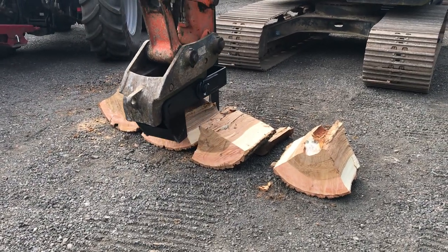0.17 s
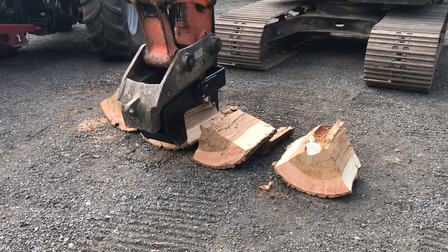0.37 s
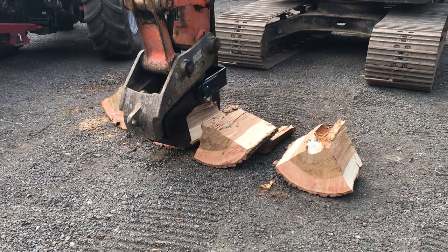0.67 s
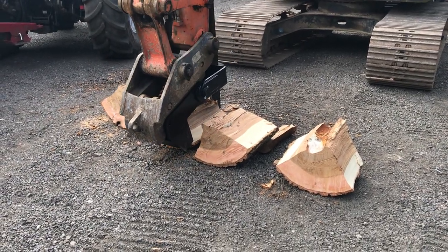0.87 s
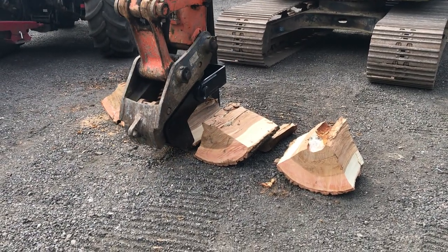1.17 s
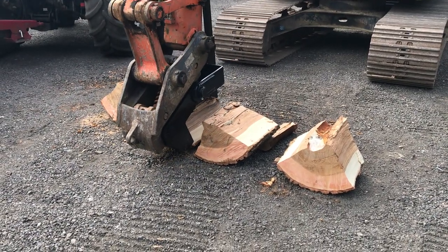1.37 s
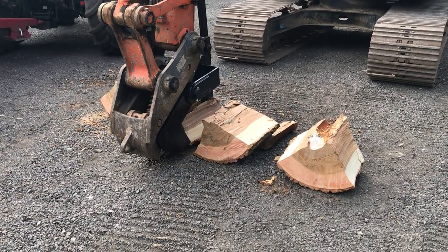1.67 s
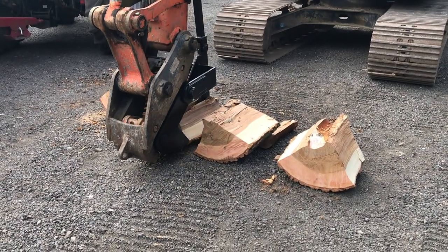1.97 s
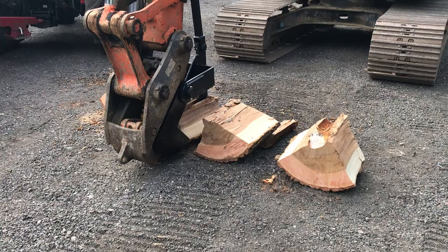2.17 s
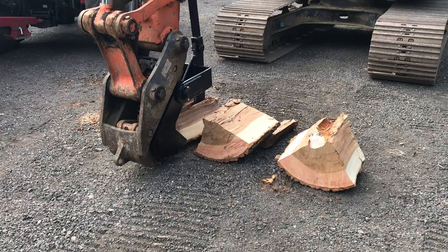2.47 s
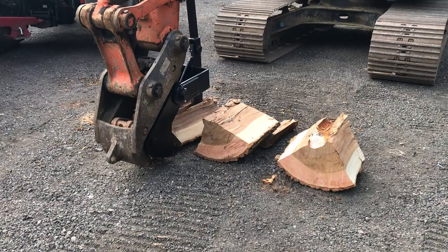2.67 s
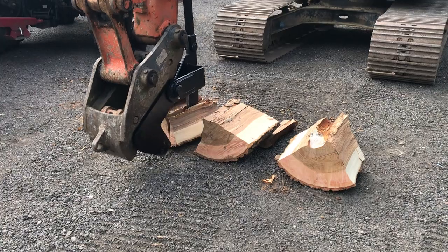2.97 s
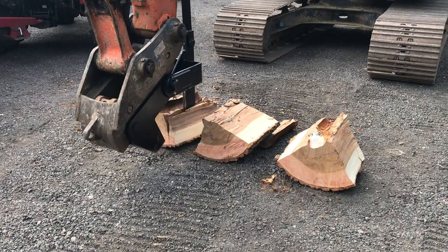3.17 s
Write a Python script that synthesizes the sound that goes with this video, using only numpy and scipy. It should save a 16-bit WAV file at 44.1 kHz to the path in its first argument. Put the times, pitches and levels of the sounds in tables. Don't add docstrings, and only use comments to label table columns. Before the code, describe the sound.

A log splits loudly over two idling diesels with low rumble and fan wash. Soft woody knocks come at 0.05 and 0.2 s, more at 0.8 s, a hollow crack at 0.95. From 1.17 to 1.32 s a harsh, buzzing tear rings with steel, then dense cracks and sharp snaps until 1.55. Pieces settle by 1.7; engines continue, a faint pump hum joins around 2.4, and valve hiss rises near 3.3.

```python
import sys
import numpy as np
from scipy import signal
from scipy.fft import rfft, irfft
from scipy.io import wavfile
from scipy.ndimage import uniform_filter1d

SR = 44100
rng = np.random.default_rng(int(sys.argv[2]) if len(sys.argv) > 2 else 0)


def gain_from_db(level_db):
    decades = np.asarray(level_db, float) / 20
    return 10 ** decades


def unload_audio(sound):
    columns = np.transpose(np.atleast_2d(sound))
    steps = np.round(np.clip(columns, -1, 1) * 32767)
    wavfile.write(sys.argv[1], SR, steps.astype(np.int16))


N = 145971


def unit(x):
    return x / np.sqrt(np.mean(x ** 2))


def noise(n=N):
    return rng.standard_normal(n)


def band(x, hz, width):
    return signal.lfilter(*signal.iirpeak(min(hz, .45 * SR), hz / width, fs=SR), x)


def colour(x, table):
    f, db = np.array(table, float).T
    bins = np.log(np.fft.rfftfreq(len(x), 1 / SR) + 1)
    gain = gain_from_db(np.interp(bins, np.log(f), db, left=-90))
    return irfft(rfft(x) * gain, len(x))


def walk(rate):
    k = int(SR / rate)
    stairs = np.repeat(noise(N // k + 1), k)
    return unit(uniform_filter1d(uniform_filter1d(stairs, k), k)[:N])


def rings(table, flicker_db, rate):
    total = np.zeros(N)
    for f, width, db in table:
        level = gain_from_db(db + flicker_db * walk(rate))
        total += level * unit(band(band(noise(), f, width), f, width))
    return total


def orders(phase, table, wobble_db, rate):
    total = np.zeros(N)
    for multiple, db in table:
        k = round(multiple)
        level = gain_from_db(db + wobble_db * np.sqrt(k) * walk(rate))
        total += np.sqrt(2) * level * np.sin(k * (phase + 1))
    return total


def rotation(hz, drift):
    return 2 * np.pi * np.cumsum(hz * (1 + drift * walk(3))) / SR


def engines(t):
    # multiple, level/dB
    near_orders = [(1, -30.5), (2, -43.5), (3, -45), (4, -44.5), (5, -55), (6, -48.5)]
    far_orders = [(1, -39), (2, -45)]
    # f/Hz, width/Hz, level/dB
    rumble = [(94.2, 26, -40), (147, 27.5, -38), (186.2, 19.6, -48.5), (221.7, 41, -43), (286, 49, -47)]
    # f/Hz, level/dB per Hz
    wash_colour = [(35, -42), (60, -9.5), (98, -6), (217, -13), (315, -20.5), (636, -28), (1410, -30),
                   (5000, -42.5), (16000, -60)]
    # f/Hz, width/Hz, level/dB
    fan = [(632, 203, -50.5), (860, 180, -52.5), (3160, 400, -61), (3244, 120, -63), (12060, 1200, -72),
           (1005, 35, -62), (1550, 90, -61), (1786, 47, -65.5), (657.3, 24, -59.5)]
    phase = rotation(47.28, 0.0023)
    tones = orders(phase, near_orders, 0.44, 5.4) + orders(rotation(112.6, 0.0064), far_orders, 2.0, 8.8)
    pump_on_s, pump_rise_s = 2.45, 0.41
    pump_gate = 1 / (1 + np.exp((pump_on_s - t) / pump_rise_s * 4))
    pump = gain_from_db(-36 + 2 * walk(15)) * np.sin(rotation(214.1, 0.0067)) * pump_gate
    wash = unit(colour(noise(), wash_colour)) * gain_from_db(-37.5 + 0.077 * walk(0.22))
    wash = wash * (1 + 0.12 * np.sin(phase))
    return tones + pump + rings(rumble, 1.33, 5.29) + wash + rings(fan, 1.43, 5.87)


def air(t):
    # t/s, level/dB
    drift = [
        (0, -63),
        (1, -63),
        (1.75, -67),
        (1.88, -69),
        (2.05, -58),
        (2.55, -75),
        (2.8, -67),
        (3.3, -58),
    ]
    # f/Hz, width/Hz, level/dB
    valves = [(9880, 300, -73), (14200, 300, -75)]
    hiss = unit(signal.lfilter(*signal.butter(2, 9000, "high", fs=SR), noise()))
    return hiss * gain_from_db(np.interp(t, *np.array(drift).T)) + rings(valves, 0.66, 2.9)


def whistle(t):
    # f/Hz, width/Hz, level/dB
    valve_modes = [(4100, 600, -59), (9000, 500, -62), (9850, 150, -66), (13500, 2200, -57)]
    peak_s, rise_s = 3.28, .06
    return rings(valve_modes, 3, 40) * np.exp(-np.abs(t - peak_s) / rise_s)


def snaps():
    # t/s, level/dB, centre f/Hz, t60/s
    splinters = [(0.201, -42, 4500, 0.027), (.465, -50.5, 11000, 0.036), (.927, -46, 10800, .04),
                 (.938, -50, 12000, .03), (.95, -37, 5870, 0.046), (.957, -47, 14000, .03),
                 (.963, -31.5, 7760, 0.062), (1.334, -26, 10000, .015), (1.345, -22, 11000, 0.022),
                 (1.345, -17, 2590, 0.027), (1.365, -47, 4010, 0.023), (1.394, -28, 4200, .015),
                 (1.395, -26, 7700, 0.044), (1.477, -35, 12000, 0.028), (1.4917, -17, 13000, 0.006),
                 (1.4912, -8.5, 8100, 0.0073), (1.491, -25, 4000, 0.015), (1.299, -22, 3500, .015),
                 (1.514, -34, 5000, .02), (1.508, -27, 10000, 0.018), (1.514, -30, 8000, 0.028),
                 (1.52, -41, 7800, .02), (1.536, -30, 9000, 0.014), (1.539, -33, 14000, 0.035),
                 (1.815, -47, 13200, .02)]
    out, u = np.zeros(N), np.arange(SR // 10) / SR
    attack = np.minimum(u / .0003, 1)
    for s, db, hz, t60 in splinters:
        tick = unit(band(band(noise(len(u)), hz, 0.98 * hz), hz, 0.87 * hz))
        out[int(s * SR):][:len(u)] += gain_from_db(db - 60 * u / t60) * attack * tick
    return out


def knocks():
    # t/s, body level/dB, body f/Hz, splinter level/dB, t60/s
    blows = [(.043, -31.5, 830, -75, 0.13), (.06, -47, 1960, -58, .2), (.2, -31.5, 2420, -63, 0.071),
             (.31, -48, 5500, -60, .05), (.805, -39, 880, -76, 0.47), (.83, -35, 1050, -70, 0.46),
             (.851, -31, 2000, -62, 0.054), (.866, -34.5, 1790, -65, 0.089), (.937, -34, 800, -66, 0.15),
             (.949, -25, 1080, -58, 0.19), (.963, -19.5, 2500, -32, 0.13), (.985, -25, 760, -39.5, 0.24),
             (1.301, -21.5, 1090, -21.5, 0.1), (1.322, -21.5, 690, -31.5, 0.34),
             (1.345, -19.5, 1200, -45, 0.1), (1.362, -27, 1500, -50, 0.048), (1.375, -31, 900, -60, 0.45),
             (1.396, -21, 3600, -35, 0.13), (1.404, -23.5, 850, -42, 0.15), (1.42, -35, 1130, -42, 0.1),
             (1.494, -25, 1390, -32, 0.039), (1.511, -35, 1800, -36, 0.05), (1.536, -35.5, 696, -46, 0.55)]
    settling = [
        (1.562, -35, 1960, -62, 0.082),
        (1.632, -32.5, 1580, -64, 0.099),
        (1.67, -50, 6170, -75, 0.73),
    ]
    # t/s, f/Hz, level/dB, t60/s
    log_modes = [(.045, 345, -25.5, 0.24), (.199, 1270, -28.5, 0.056), (.228, 1250, -33, 0.054),
                 (.199, 2700, -28.5, 0.033), (.2, 5400, -36, .03), (.218, 2500, -35, 0.037),
                 (.043, 1000, -28, 0.099), (.045, 1260, -29.5, .09), (.068, 870, -29.5, .08),
                 (.07, 2000, -42, .05), (.836, 990, -33, .05), (.853, 990, -27, .06),
                 (.857, 3100, -35, .04), (.866, 790, -28, .07), (.868, 2800, -39, 0.057),
                 (1.4, 2700, -35, .03), (.9, 840, -32, 0.089), (.949, 1240, -25, 0.036),
                 (.955, 343, -29, 0.36), (.952, 600, -19, 0.1), (.964, 2020, -13.5, 0.056),
                 (.97, 1900, -13, 0.054), (.977, 2000, -17.5, 0.038), (.965, 2930, -29, 0.036),
                 (.972, 3100, -30, .06), (.978, 520, -27.5, 0.26), (.972, 1080, -23, 0.082),
                 (.989, 960, -22.5, 0.18), (1.01, 2400, -35, .08),
                 (1.298, 960, -15, 0.1), (1.303, 640, -14, 0.042), (1.303, 2200, -20, 0.035),
                  (1.295, 336, -21, 0.28), (1.321, 590, -18.5, .08), (1.32, 227.8, -20, 0.3),
                  (1.335, 3700, -28, .05), (1.348, 1100, -24, .06), (1.372, 880, -18, .04),
                  (1.39, 980, -19, 0.028), (1.396, 4500, -20, 0.045), (1.402, 3700, -17, 0.075),
                  (1.397, 1880, -19, 0.049), (1.398, 2820, -25, .08), (1.403, 540, -18.5, 0.052),
                  (1.41, 1335, -23.5, 0.13), (1.435, 800, -28, 0.16), (1.495, 730, -14, 0.038),
                  (1.496, 1350, -21, 0.028), (1.515, 770, -28.5, .06), (1, 580, -35, 0.088),
                  (1.42, 740, -21, 0.051), (1.36, 350, -22.5, .12), (1.27, 300, -22, 0.13)]
    hollow_hz = [604, 835, 986, 1230, 1840, 2300, 3100, 3460, 4170]
    out, u = np.zeros(N + SR), np.arange(SR // 3) / SR
    splinter_filter = signal.butter(2, 4500, "high", fs=SR)

    def fade(t60):
        return np.minimum(u / 0.002, 1) * gain_from_db(-60 * u / t60)

    for s, body_db, hz, splinter_db, t60 in blows + settling:
        grains = np.interp(u * 900, np.arange(500), noise(500))
        grit = rng.standard_normal((2, len(u))) * gain_from_db(3 * grains)
        body_width = 1.16 * hz
        wide = unit(band(band(grit[0], hz, body_width), hz, body_width))
        detuned = hollow_hz * np.exp(0.049 * noise(len(hollow_hz)))
        hollow = unit(sum(band(wide, f, 0.11 * f) for f in detuned))
        body = (wide + .4 * hollow) * gain_from_db(body_db - 2.5) * fade(t60)
        hiss = unit(signal.lfilter(*splinter_filter, grit[1])) * gain_from_db(splinter_db) * fade(t60 * 0.83)
        out[int(s * SR):][:len(u)] += body + hiss

    steps = u * 110
    for s, hz, db, t60 in log_modes:
        rough = np.interp(steps, np.arange(60), noise(60))
        waver = np.interp(steps, np.arange(60), noise(60))
        level = gain_from_db(db + 2.5 * rough * np.minimum(steps / 2, 1))
        tone = np.sin(2 * np.pi * hz * u + 2 * .55 * waver)
        out[int(s * SR):][:len(u)] += level * fade(t60) * tone
    return out[:N]


def judder(t):
    # t/s, level/dB, treble/dB
    course = [
        (1.1748, -20, 11),
        (1.182, -16.5, 5.5),
        (1.2, -16, 3),
        (1.26, -14.5, 3.5),
        (1.285, -14.5, -2),
        (1.3, -15, -4),
        (1.304, -20, -8),
        (1.325, -50, -14),
    ]
    # f/Hz, level/dB per Hz
    fibre_colour = [(240, -57), (400, -17), (496, -18), (562, -4.5), (1600, -10.5), (3750, -19),
                    (4880, -13), (13500, -10), (16000, -18.5)]
    # f/Hz, width/Hz, level/dB
    steel = [(2180, 450, -16.5), (3290, 200, -17), (3740, 560, -10), (9480, 230, -13.5), (13600, 1700, -19)]
    # f/Hz, width/Hz, level/dB
    struck_steel = [(760, 150, -19.5), (1130, 220, -20), (1500, 440, -16.5), (1960, 190, -17.5),
                    (2200, 180, -21), (2830, 150, -19), (3290, 140, -11), (3610, 100, -12.5),
                    (3900, 170, -23), (4500, 510, -29)]
    # multiple, level/dB
    flexing = [(1, -7), (2, -12), (3, -14.5), (4, -16), (5, -36), (6, -23), (8, -27)]
    s, db, treble_db = np.array(course).T
    on = (t >= s[0]) & (t < s[-1])
    cycles = np.cumsum(on * 186.6 * (1 + .008 * walk(60))) / SR
    slip_size = gain_from_db(0.8 * noise(40))[cycles.astype(int)]
    part = cycles % 1

    def gate(steady, decay):
        return steady + slip_size * np.minimum(part / .05, 1) * np.exp(-part / decay)

    fibres = noise() * gain_from_db(3.5 * noise())
    tear = unit(colour(fibres, fibre_colour)) + rings(steel, 0.95, 58.8)
    low = signal.filtfilt(*signal.butter(2, 5000, fs=SR), tear)
    high = (tear - low) * gain_from_db(np.interp(t, s, treble_db) + 6.5) * gate(.09, .22)

    slips = np.diff(np.floor(cycles), prepend=0)
    struck = np.zeros(N)
    for f, width, mode_db in struck_steel:
        clicks = slips * gain_from_db(2.5 * walk(150))
        struck += gain_from_db(mode_db) * np.sqrt(on.mean()) * unit(band(clicks, f, width))

    age = np.clip(t - s[0], 0, None)
    start_hz, glide_hz_per_s = 181.7, 81
    flex = orders(2 * np.pi * (start_hz + glide_hz_per_s * age / 2) * age, flexing, 1.9, 39.88)
    fade_s, fade_db_per_s = 1.237, 148
    flex = flex * gain_from_db(-fade_db_per_s * np.clip(t - fade_s, 0, None))
    return on * gain_from_db(np.interp(t, s, db)) * (gate(0.56, 0.56) * low + high + flex + struck)


def yard_echo(wood):
    u = np.arange(SR // 2) / SR
    tail = signal.lfilter(*signal.butter(1, 5000, fs=SR), noise(len(u)))
    tail = tail * gain_from_db(-60 * u / 0.22) * (u > .006)
    return signal.fftconvolve(wood, tail / np.sqrt(np.sum(tail ** 2)))[:N] * gain_from_db(-11.5)


def scene():
    # t/s, level/dB
    gain_control = [
        (1.17, 3.5),
        (1.25, 2),
        (1.42, 3),
        (1.55, 2.5),
    ]
    t = np.arange(N) / SR
    background = engines(t) + air(t) + whistle(t)
    wood = snaps() + knocks() + judder(t)
    duck = gain_from_db(np.interp(t, *np.array(gain_control).T))
    return (wood + yard_echo(wood) + duck * background)[None]


def low_pass(x):
    return signal.sosfilt(signal.butter(12, 16320, fs=SR, output="sos"), x)


def record(dry):
    # f/Hz, width/Hz, share removed
    dips = [(5000, 370, 0.3), (10360, 1030, 0.49)]
    for hz, width, share in dips:
        dry = dry - np.clip(share, 0, 1) * band(dry, hz, width)
    ceiling = .55
    limited = ceiling * np.tanh(dry / ceiling)
    top_cut = signal.ellip(10, .3, 35, 15900, fs=SR, output="sos")
    return low_pass(signal.sosfilt(top_cut, limited))


dry = scene()
out = record(dry)
unload_audio(out)
```